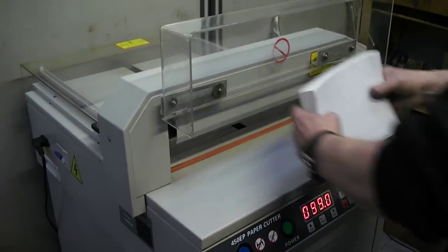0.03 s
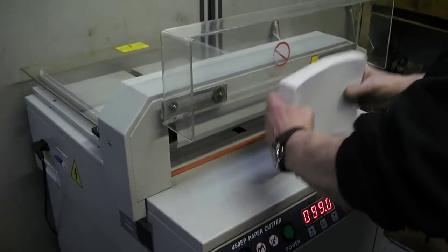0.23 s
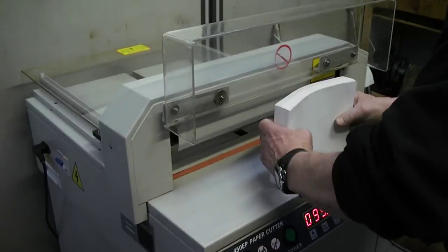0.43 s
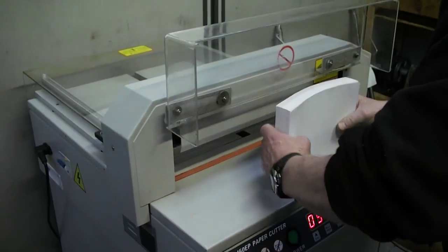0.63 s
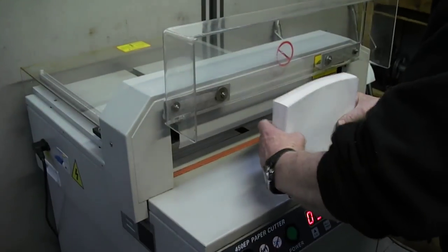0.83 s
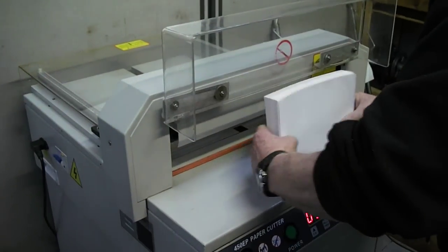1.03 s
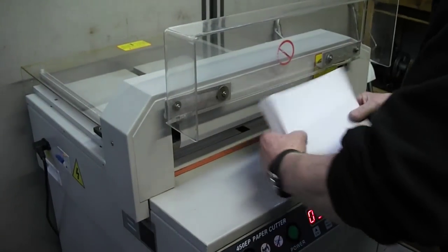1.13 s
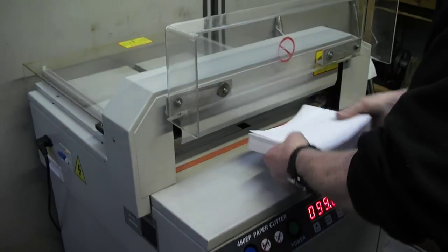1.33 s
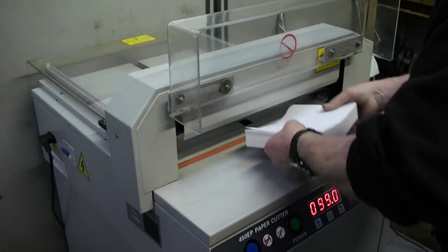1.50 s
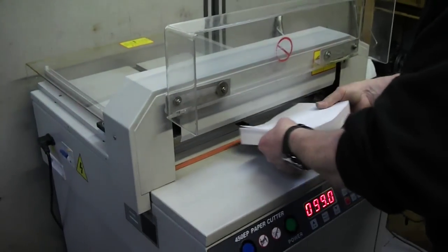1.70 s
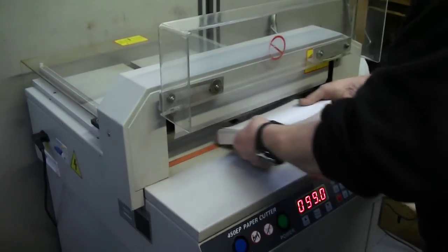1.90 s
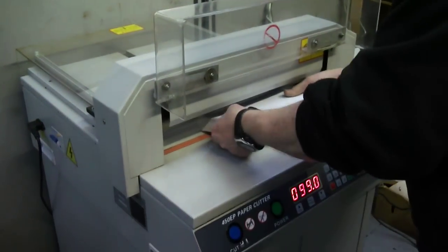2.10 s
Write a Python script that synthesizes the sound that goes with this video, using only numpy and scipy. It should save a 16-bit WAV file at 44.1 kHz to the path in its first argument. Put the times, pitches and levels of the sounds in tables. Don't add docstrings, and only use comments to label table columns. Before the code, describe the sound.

Thick stack of paper knocked square on a steel machine table, with booming thumps and paper rustle

```python
import sys
import numpy as np
from scipy import signal
from scipy.fft import rfft, irfft, next_fast_len
from scipy.io import wavfile
from scipy.ndimage import uniform_filter1d

SR = 44100
rng = np.random.default_rng(int(sys.argv[2]) if len(sys.argv) > 2 else 0)


def attenuation_scalar(level_db):
    decades = np.asarray(level_db, float) / 20
    return 10 ** decades


def inscribe(sig):
    pcm = np.round(np.clip(np.atleast_2d(sig).T, -1, 1) * 32767)
    wavfile.write(sys.argv[1], SR, pcm.astype(np.int16))


N = 94815
T = np.arange(N) / SR


def unit(x):
    return x / np.sqrt(np.mean(x ** 2) + 1e-20)


def along(points, hz):
    f, value = np.transpose(points)
    return np.interp(np.log(hz + 1), np.log(f + 1), value)


def filtered(x, response):
    size = next_fast_len(x.shape[-1] + 4096)
    spectrum = rfft(x, size) * response(np.fft.rfftfreq(size, 1 / SR))
    return irfft(spectrum, size)[..., :x.shape[-1]]


def grains(points, spiky_db, tilt_db=0, size=N):
    unevenness = unit(uniform_filter1d(rng.standard_normal(size), size=20))
    clicks = rng.standard_normal(size) * attenuation_scalar(spiky_db * unevenness)
    return unit(filtered(clicks, lambda hz: attenuation_scalar(along(points, hz) + tilt_db * np.log2((hz + 50) / 3000))))


def diffuse(pair, alike):
    def mid_side_gain(hz):
        turn = np.arccos(np.clip(along(alike, hz), -1, 1)) / 2
        return np.array([np.cos(turn), np.sin(turn)])

    mid, side = filtered(pair, mid_side_gain)
    return np.array([mid + side, mid - side])


def gate(s, length, rise, fall):
    return np.clip((T - s) / rise, 0, 1) * np.exp(-np.clip(T - s - length, 0, None) / fall)


def ring(modes, s, rise):
    t = np.clip(T - s, 0, None)
    swinging = sum(attenuation_scalar(db - 60 * t / t60) * np.cos(2 * np.pi * hz * t) for hz, db, t60 in modes)
    return swinging * (1 - np.exp(-t / rise))


def tail(early_db=-60):
    # (frequency [Hz], t60 [s])
    decay = [(100, 1), (400, 0.72), (1500, 0.79), (4000, 0.67), (9000, 0.59), (15000, 0.27)]
    # (frequency [Hz], likeness [0-1])
    likeness = [(2000, 1), (6000, 1), (15000, .9)]
    early_t60_s, wall_s = 0.11, 0.0023
    hz, t, z = signal.stft(rng.standard_normal((2, SR)), SR, nperseg=256)
    fade = attenuation_scalar(-60 * t / along(decay, hz)[:, None]) + attenuation_scalar(early_db - 60 * t / early_t60_s)
    out = diffuse(signal.istft(z * fade, SR, nperseg=256)[1], likeness)
    out = out * np.clip(np.arange(out.shape[1]) / SR / wall_s - 1, 0, 1)
    return out / np.linalg.norm(out[0])


def room(x):
    return signal.fftconvolve(x[None], tail(), axes=1)[:, :N]


def hum():
    # (frequency [Hz], density [dB per Hz])
    hiss = [(120, -23.5), (200, 0.5), (659, -7.5), (735, -8), (1100, -10), (1480, -11.5), (4680, -15),
            (11500, -19.5), (16000, -22)]
    # (frequency [Hz], density [dB per Hz])
    rumble = [(15, -5.5), (30, 4.5), (55, -3.5), (80, -7), (170, -8.5), (200, -64)]
    # (frequency [Hz], likeness [0-1])
    likeness = [(1400, 1), (3100, 1), (6800, 0.93), (15000, 0.44)]
    hiss_db, whine_db, rumble_db = -52.5 + 1.15, -56.5, -46
    whine_hz, whine_wide_hz = 11440, 1110

    def around(colour):
        return unit(diffuse(filtered(rng.standard_normal((2, N)), colour), likeness))

    out = attenuation_scalar(hiss_db) * around(lambda f: attenuation_scalar(along(hiss, f)))
    out = out + attenuation_scalar(whine_db) * around(lambda f: np.exp(-((f - whine_hz) / whine_wide_hz) ** 2))
    return out + attenuation_scalar(rumble_db) * around(lambda f: attenuation_scalar(along(rumble, f)))


def flaps():
    # (time [s], length [s], level [dB], room level [dB])
    bursts = [
        (-.02, 0.072, -28, -32),
        (.2145, .027, -11.5, -17.5),
    ]
    # (frequency [Hz], density [dB per Hz])
    colours = [
        [(94, -48), (160, 0), (528, -7), (733, -3.5), (1710, -10.5), (2420, -4.5), (5440, -5.5), (16000, -22.5)],
        [(94, -52), (160, -19), (762, -7), (1230, -11), (2990, -0.5), (4400, -5), (6350, -5), (13700, -26),
         (16000, -34.5)],
    ]
    out = 0
    for (s, length, db, wet_db), colour in zip(bursts, colours):
        answer = filtered(tail(), lambda hz: attenuation_scalar(along(colour, hz)))
        answer = answer / np.std(answer[:, :4096])
        start = round((s + length) * SR)
        wet = np.pad(answer, ((0, 0), (start, N)))[:, :N]
        puff = gate(s, length, .005, 0.0065) * grains(colour, spiky_db=0.8)
        out = out + attenuation_scalar(db) * puff + attenuation_scalar(wet_db) * wet
    return out


def sliding():
    # (time of full pressure [s], rise [s], hold [s], level [dB], brightness [dB per octave])
    strokes = [
        (0.152, 0.033, 0.043, -41.5, 6.5),
        (.49, .015, 0.019, -39.5, 3),
        (0.72, 0.076, 0.13, -40, -6),
        (0.943, 0.049, 0.043, -44.5, -7.5),
        (1.193, 0.01, 0.016, -31.5, 7),
        (1.348, 0.013, 0.065, -51.5, 4),
        (1.997, 0.042, 0.053, -44.5, 1),
        (2.057, 0.014, 0.021, -40, 2.5),
        (2.092, 0.0096, .08, -38, 3.5),
    ]
    # (time [s], peak [dB], frequency [Hz])
    snaps = [
        (1.2, -18, 5140),
        (1.2086, -13.5, 7200),
        (1.4096, -30, 5400),
        (2.0494, -36, 5460),
        (2.1434, -26, 5570),
    ]
    # (frequency [Hz], density [dB per Hz])
    friction = [(240, -30), (400, -12.5), (719, -8.5), (921, -10.5), (1960, -13.5), (2360, -10.5),
                (5600, -2.5), (16000, -24.5)]
    fall_over_rise, wet_db, snap_t60_s = 0.52, -17, 0.0071
    dry, rub = 0, grains(friction, spiky_db=-1, tilt_db=1.5)
    for s, rise, hold, db, tilt_db in strokes:
        swell = np.clip((T - s) / rise, None, 0)
        release = np.clip((T - s - hold) / (fall_over_rise * rise), 0, None)
        dry = dry + attenuation_scalar(db) * np.exp(swell - release) * grains(friction, spiky_db=2.5, tilt_db=tilt_db)
    for s, db, hz in snaps:
        t = np.clip(T - s, 0, 1)
        fade = attenuation_scalar(db - 3 - 60 * t / snap_t60_s) * (t > 0)
        dry = dry + fade * (0.96 * np.sin(2 * np.pi * hz * t) + 0.67 * rub)
    return dry + attenuation_scalar(wet_db) * room(dry)


def thuds():
    # (time [s], frequency [Hz], level [dB], t60 [s])
    presses = [
        (0.226, 182, -18.5, 0.19),
        (.63, 84.5, -27, 0.55),
        (0.744, 126.7, -26, 0.55),
        (.77, 74, -33, 0.68),
        (1.11, 83.6, -28, 0.71),
        (2.029, 277, -46, 0.47),
    ]
    return sum(ring([(hz, db, t60)], s, 0.013) for s, hz, db, t60 in presses)


def knocks():
    times = [
        .5133,
        .9935,
    ]
    # (table top [dB], cabinet [dB], room [dB])
    strengths = [
        (-0.5, -22, -21.5),
        (-13.5, -29, -22),
    ]
    # (time [s], level [dB], t60 [s], brightness [dB per octave])
    contacts = [
        (0.5166, -1, 0.024, -0.5),
        (0.5186, 1.5, 0.022, 0),
        (.5245, -5.5, 0.023, 18),
        (0.5273, -1.5, 0.029, 8),
        (0.53, -15, 0.11, -2),
        (0.579, -19, .03, -3),
        (0.996, -1.5, 0.031, 1.5),
        (0.9993, -1.5, 0.016, 2.5),
        (1.0049, -18, 0.14, 0),
        (1.014, -21, 0.11, -5),
    ]
    # (frequency [Hz], density [dB per Hz])
    colours = [
        [(280, -42), (480, -11), (985, -2), (1510, -10), (2310, -1.5), (3640, -5), (5170, -3), (10600, -12.5),
         (16000, -34)],
        [(240, -13), (400, -11), (687, -2), (3120, -1), (3580, -11), (4440, -3), (8110, -17.5), (12100, -32),
         (16000, -34)],
    ]
    # (frequency [Hz], level [dB], t60 [s])
    table_top = [(251.3, 5.5, 0.054), (280.5, -7.5, .22), (116.3, -5, 0.19), (92.3, -10, 0.19),
                 (177, -23, 0.062), (669, -17, 0.21), (906, -8.5, 0.073), (1110, -9, .05),
                 (502, -21, 0.073)]
    # (frequency [Hz], level [dB], t60 [s])
    cabinet = [(122.5, -9, 5), (130.2, -10, 1), (115.2, -12.5, 1.5), (97.5, -9, 4.2), (87.5, -7.5, 2.47),
               (80.7, -4.5, 0.95), (66.7, -12, 1.6), (155, -12, 2.1), (226, -18.5, 2.3), (196, -34, 0.81),
               (58.7, -16, 3)]
    # (frequency [Hz], density [dB per Hz])
    answer_colour = [(100, -40), (170, -5), (279, -0.5), (423, -7.5), (694, -6), (1570, -15.5),
                     (5020, -14.5), (8870, -23.5), (16000, -50)]
    out, t = np.zeros((2, N + 2 * SR)), np.arange(8192) / SR
    # -15 dB, t60 0.11 s
    corners = [(s, -15, 0.11, -1.5) for s in times]
    for s, db, t60, tilt_db in contacts + corners:
        colour = colours[np.argmin(np.abs(s - np.array(times)))]
        smack = np.clip(t / 0.0005, 0, 1) * grains(colour, spiky_db=0.5, tilt_db=tilt_db, size=8192)
        out[:, round(s * SR):][:, :len(t)] += attenuation_scalar(db - 60 * t / t60) * smack
    for s, (top_db, boom_db, wet_db) in zip(times, strengths):
        answer = filtered(tail(early_db=1.5), lambda hz: attenuation_scalar(along(answer_colour, hz)))
        answer = answer / np.std(answer[:, :4096])
        out[:, round(s * SR):][:, :answer.shape[1]] += attenuation_scalar(wet_db) * answer
        out[:, :N] += attenuation_scalar(top_db) * ring(table_top, s, rise=0.0052)
        out[:, :N] += attenuation_scalar(boom_db) * ring(cabinet, s, rise=0.03)
    return out[:, :N]


def squeaks():
    # (time [s], length [s], level [dB])
    calls = [
        (1.563, 0.062, -46),
        (1.817, 0.1, -58),
    ]
    # (frequency [Hz], width [Hz], level [dB])
    resonances = [(3070, 900, -15), (4470, 380, 2), (5450, 310, 8), (6030, 1100, -22)]
    wet_db = -6.5

    def body(f):
        return sum(attenuation_scalar(db) * 1j * f * w / (c * c - f * f + 1j * f * w) for c, w, db in resonances)

    loudness = sum(attenuation_scalar(db) * gate(s, length, 0.0037, 0.039) for s, length, db in calls)
    dry = unit(filtered(rng.standard_normal(N), body)) * loudness
    return dry + attenuation_scalar(wet_db) * room(dry)


def scene():
    # (frequency [Hz], level [dB])
    microphone = [(20, 0.5), (60, 0), (14500, 0.5), (17000, -10)]
    lag_s = np.array([[1], [0]]) / SR
    mix = hum() + flaps() + sliding() + thuds() + knocks() + squeaks()
    return filtered(mix, lambda f: attenuation_scalar(along(microphone, f)) * np.exp(-2j * np.pi * f * lag_s))


def low_pass(x):
    return signal.sosfilt(signal.butter(12, 16180, fs=SR, output="sos"), x)


def record(dry):
    duck_over_db, duck_share, duck_back_s = -24, 0.13, 0.26
    power = np.abs(uniform_filter1d(np.mean(dry ** 2, 0), size=441))
    level_db = 10 * np.log10(power + 1e-12)
    cut_db = duck_share * np.clip(level_db - duck_over_db, 0, None)
    slope = T / duck_back_s
    held_db = np.exp(np.maximum.accumulate(np.log(cut_db + 1e-6) + slope) - slope)
    late_db = np.pad(uniform_filter1d(held_db, size=441), (441, 0))[:N]
    mix = np.clip(dry * attenuation_scalar(-late_db), -.99, .99)
    return low_pass(mix)


dry = scene()
out = record(dry)
inscribe(out)
```